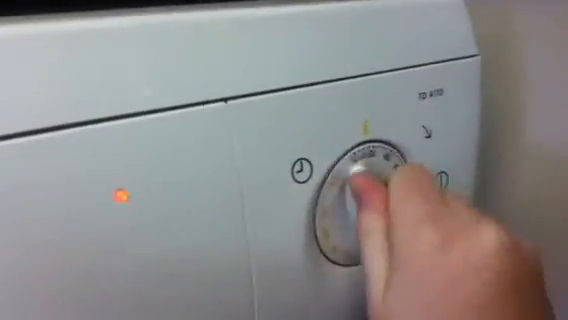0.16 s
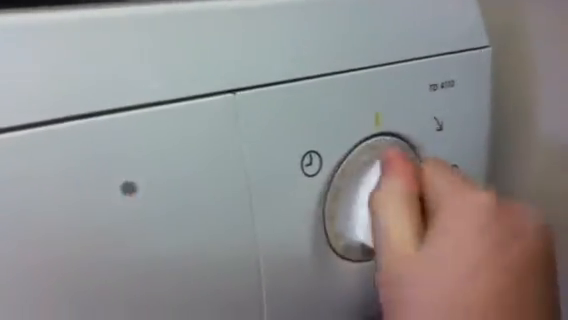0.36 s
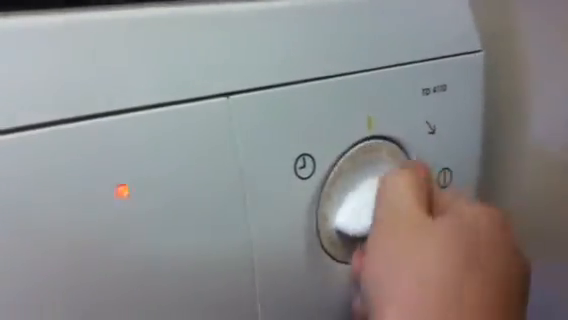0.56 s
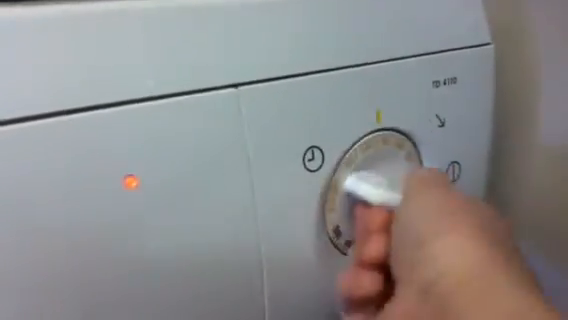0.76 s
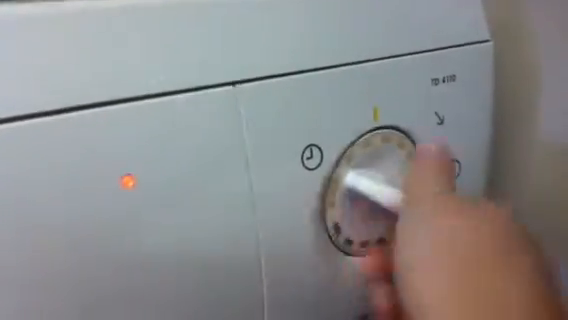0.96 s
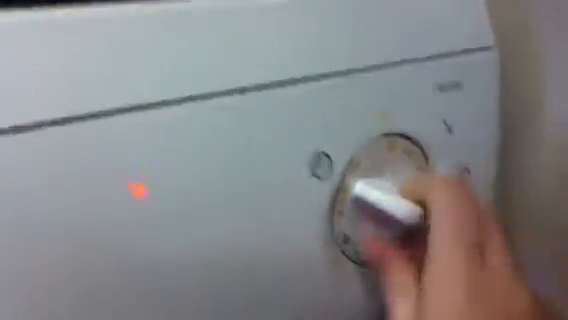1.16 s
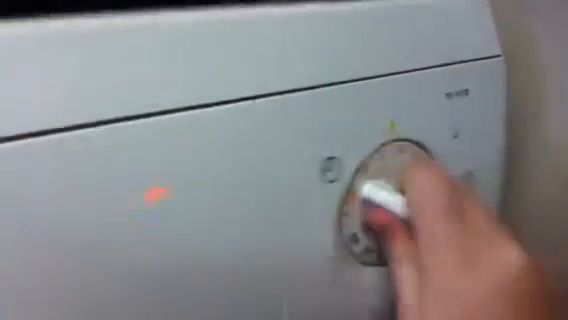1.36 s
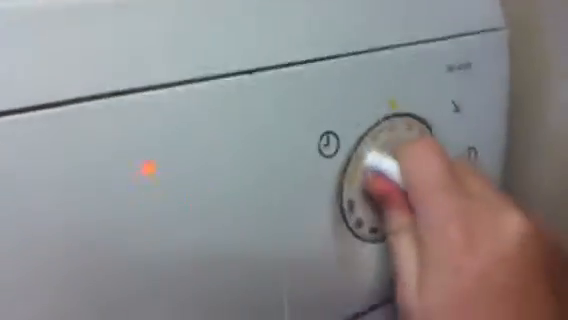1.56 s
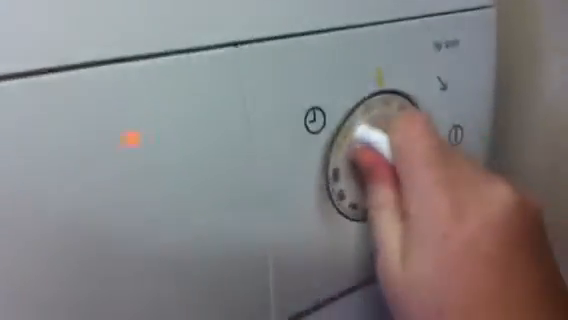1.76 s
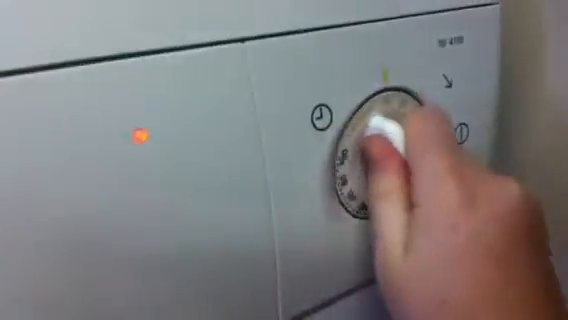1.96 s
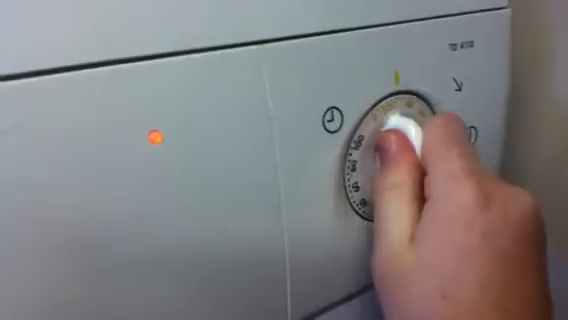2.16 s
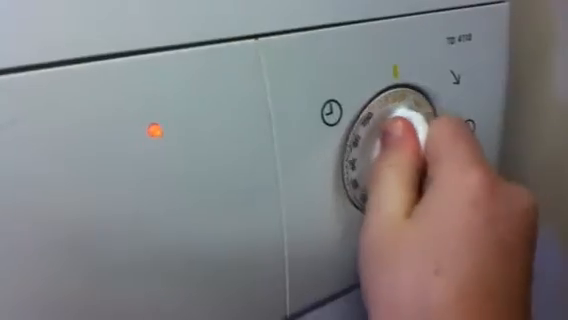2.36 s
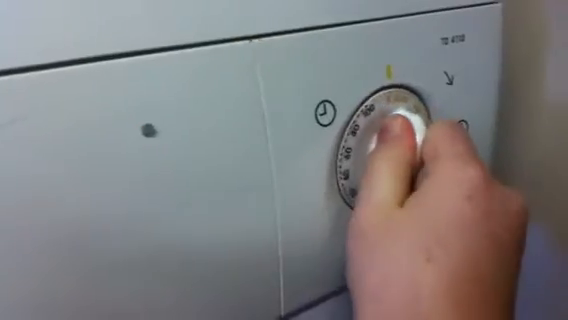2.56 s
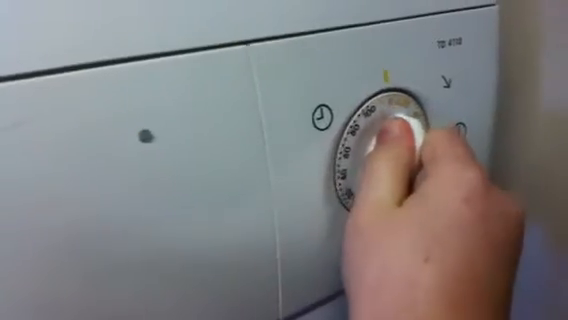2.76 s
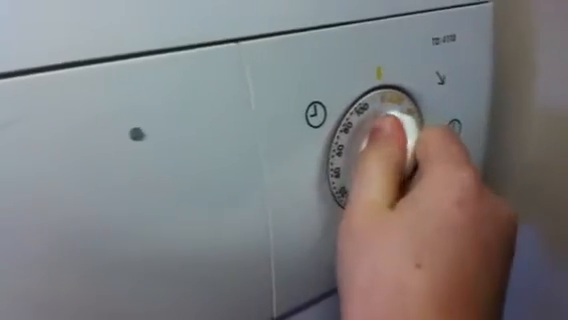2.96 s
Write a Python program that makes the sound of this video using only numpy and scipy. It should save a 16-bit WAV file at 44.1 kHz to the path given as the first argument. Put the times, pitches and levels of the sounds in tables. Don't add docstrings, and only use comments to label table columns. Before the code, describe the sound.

Appliance timer knob turned by hand: fast ratchet clicking, soft finger taps, then crisp single clicks

```python
import sys
import numpy as np
from scipy import signal
from scipy.fft import rfft, irfft, next_fast_len
from scipy.io import wavfile
from scipy.ndimage import uniform_filter1d, map_coordinates

SR = 44100
rng = np.random.default_rng(int(sys.argv[2]) if len(sys.argv) > 2 else 0)


def generate_wav(sig):
    pcm = np.round(np.clip(np.atleast_2d(sig).T, -1, 1) * 32767).astype(np.int16)
    wavfile.write(sys.argv[1], SR, pcm)


def nominal_scale(level):
    x = np.asarray(level, float) / 20
    return 10 ** x


N = 134505
LENGTH = 16384
BIN_HZ = np.fft.rfftfreq(LENGTH, 1 / SR)
MODE_DETUNE, PANEL_DETUNE = .012, .005

# f/Hz, width/Hz, level/dB
PANEL = [(178.7, 13.8, 4), (222.3, 20.4, 1), (292.7, 26, -0.5), (330.3, 33, -1), (375.3, 33, -3),
         (481, 28, -5), (590, 31, -8), (632, 27, -1.5), (680, 55, -8.5), (796, 18, -10)]


def ratchet():
    # t/s, snap level/dB, pawl f/Hz, dial level/dB, panel level/dB
    loose_run = [(.1465, -8, 4800, -11, -22.5), (.1535, -9, 4500, -20.5, -31),
                 (.1605, -18, 4800, -19.5, -34), (.1885, -17.5, 4800, -18.5, -23),
                 (.1975, -4, 4250, -12, -27.5), (.2045, -15, 4500, -38, -29.5),
                 (.2243, -9.5, 5000, -18, -27), (.2455, -7, 4630, -10.5, -34),
                 (.2655, -7.5, 4270, -16, -23), (.2735, -23.5, 4500, -10.5, -37.5),
                 (.2868, -7, 4430, -22.5, -28), (.2945, -24, 4370, -12, -24),
                 (.3105, -7.5, 4660, -18, -19.5)]
    steady_run = [(0.3451, -4.5, 4650, -15.5, -25), (0.3617, -7, 4620, -16, -26.5),
                  (0.389, -6.5, 4760, -15.5, -21.5), (0.4127, -6, 4660, -17, -25.5),
                  (0.4468, -8, 4760, -15.5, -21.5), (0.4706, -6, 4520, -16.5, -24),
                  (0.5097, -8.5, 4540, -17, -23), (0.5513, -9.5, 4990, -15.5, -24.5),
                  (0.5586, -6, 4640, -21.5, -32.5), (0.597, -9.5, 4670, -18.5, -23.5),
                  (0.633, -11.5, 4320, -19.5, -23.5), (0.6526, -11, 4620, -14.5, -35),
                  (0.6702, -6, 4840, -17.5, -21), (0.6882, -8, 4780, -14, -32.5),
                  (0.7088, -8, 4840, -13, -32), (0.7331, -8, 4710, -15.5, -28),
                  (0.7558, -9.5, 4700, -17.5, -27.5), (0.7771, -10, 4240, -20.5, -21),
                  (0.813, -7, 5060, -15.5, -34), (0.835, -8.5, 5000, -19, -28),
                  (0.8575, -8.5, 4220, -16.5, -26), (0.8775, -6.5, 4420, -17.5, -25),
                  (0.9084, -8.5, 4540, -15.5, -29), (0.9472, -9.5, 4500, -17, -27)]
    # t/s, snap level/dB, pawl f/Hz, dial f/Hz, wheel f/Hz
    teeth = [(1.6291, -3.5, 4350, 1860, 8210), (1.7047, -2.5, 4700, 1590, 7250),
             (1.8598, -4.5, 4720, 1670, 6390), (1.942, -3, 4600, 1590, 7140),
             (2.0311, -5, 4780, 1910, 7330), (2.0833, -4.5, 4790, 2050, 7200),
             (2.1463, -8, 4700, 1840, 6640), (2.2024, -6.5, 4700, 1590, 7140),
             (2.2629, -8.5, 4320, 1650, 6840), (2.3577, -9.5, 4500, 2260, 6000),
             (2.4015, -6.5, 4420, 1795, 6800), (2.4734, -5.5, 4430, 1770, 6400),
             (2.5148, -6.5, 4300, 1590, 6360), (2.588, -4, 5030, 1590, 7340), (2.771, -3, 4550, 1950, 6390)]
    # dial level/dB, panel level/dB, pawl level/dB, wheel level/dB
    tooth_mix = [(-14.5, -22.5, 29, 24), (-8.5, -23.5, 8, -4.5), (-12.5, -25.5, 3, -4.5), (-14, -24, 9, 1),
                 (-17, -25, 9, -4.5), (-17.5, -29.5, 12, -16.5), (-16.5, -29, 5.5, -7), (-18, -27, -2, -2),
                 (-17.5, -29.5, -1, 1), (-23, -25.5, 20.5, 11), (-17.5, -31.5, 18, 5),
                 (-21.5, -26.5, 19.5, 3.5), (-16.5, -25, 11, 3.5), (-15, -27, 9.5, 2.5),
                 (-14, -26.5, -2.5, -3.5)]
    # f/Hz, width/Hz, level/dB
    dial_modes = [(1235, 237, -9.5), (1590, 55, 5.5), (1798, 32, -4), (1882, 73, 6.5), (2220, 890, 2.5)]
    snap_trim_db, chatter_s = -12, .019

    out = np.zeros(N)
    for rows, run_chatter_s, pawl_db, tilt_db in ((loose_run, .035, 3, -2.5),
                                                  (steady_run, chatter_s, 14, -1.1)):
        s, snap_db, pawl_hz, dial_db, panel_db = np.transpose(rows)
        out += blows(s, snap_db + snap_trim_db, pawl_hz, dial_db, panel_db, dial_modes, run_chatter_s,
                     pawl_db, wheel_db=1.7, case_db=0.53, tilt_db=tilt_db)

    s, snap_db, pawl_hz, dial_hz, wheel_hz = np.transpose(teeth)
    dial_db, panel_db, pawl_db, wheel_db = np.transpose(tooth_mix)
    return out + blows(s, snap_db + snap_trim_db - 1.5, pawl_hz, dial_db, panel_db, dial_modes, chatter_s,
                       pawl_db[:, None] + 2.5, wheel_db[:, None], case_db=-2.0, tilt_db=1.7,
                       favoured_hz=(dial_hz[:, None], wheel_hz[:, None]))


def fingers():
    # t/s, tick level/dB, dial level/dB, panel level/dB
    taps = [(0.0856, -26.5, -48, -42), (0.096, -29.5, -29, -38.5), (1.0539, -25, -33.5, -37),
            (1.0687, -22.5, -26, -36), (1.0838, -22.5, -36, -46), (1.096, -34, -21.5, -33.5),
            (1.1096, -30, -60, -59), (1.1394, -23, -34.5, -42), (1.2378, -22.5, -24.5, -33.5),
            (1.2495, -11.5, -14.5, -27), (1.2626, -40, -20.5, -26.5), (1.278, -14, -25, -30),
            (1.4748, -17.5, -22.5, -33.5), (1.535, -17, -19, -31.5)]
    # f/Hz, width/Hz, level/dB
    knob_modes = [(307, 37, 3), (865, 1100, 1), (1360, 1260, 1.5), (2200, 140, 0)]
    s, tick_db, dial_db, panel_db = np.transpose(taps)
    pawl_hz = np.full(len(s), 4500)
    return blows(s, tick_db - 21.5, pawl_hz, dial_db + .1, panel_db + 0.11, knob_modes, chatter_s=0.0059,
                 pawl_db=-35.0, wheel_db=-6.5, case_db=2.2, front_db=-12)


def blows(s, snap_db, pawl_hz, dial_db, panel_db, dial_modes, chatter_s, pawl_db, wheel_db, case_db,
          tilt_db=0, favoured_hz=None, front_db=0):
    # f/Hz, width/Hz, level/dB
    wheel_modes = [(3076, 81, 7.5), (3395, 360, -7), (5260, 410, -1), (6300, 100, 8.5), (7050, 2000, -7.5),
                   (9020, 2520, -5), (11570, 1900, -16)]
    # f/Hz, width/Hz, level/dB
    front_modes = [(1364, 24, -2), (1613, 35, 7), (1770, 30, 1), (1890, 35, 3), (2310, 28, -9.5),
                   (2550, 16, -10), (3070, 13, -2.5), (3460, 17, 2.5), (4230, 33, 0), (4640, 30, -4),
                   (4800, 53, -2), (5760, 42, 7.5)]
    # f/Hz, level/dB
    crack = [(1470, -47.5), (2500, -12), (4730, -4), (5920, -8.5), (8200, -8), (12900, -36.5), (16000, -45)]
    count, f = len(s), BIN_HZ
    burst = contacts(count, chatter_s)

    def part(response, db):
        return nominal_scale(db)[:, None] * unit(irfft(burst * response, LENGTH))

    pawl = peak(f, np.clip(pawl_hz, 4350, 4950)[:, None], 190)
    metal = nominal_scale(wheel_db) * body(wheel_modes, count) + nominal_scale(pawl_db) * pawl
    plastic = body(dial_modes, count)
    if favoured_hz:
        plastic = plastic + nominal_scale(12.4) * peak(f, favoured_hz[0], 107)
        metal = metal + nominal_scale(6.7) * peak(f, favoured_hz[1], 142)
    metal = metal + nominal_scale(-4.5 + along(crack, f))
    metal = metal * nominal_scale(tilt_db * np.log2(f / 4500 + .1)) / (1 + 1j * f / 11000) ** 2
    plastic = plastic / (1 + 1j * f / 3030) ** 2

    full = part(metal, snap_db)
    full += part(plastic, dial_db - 8)
    full += part(body(front_modes, count, PANEL_DETUNE), dial_db - 18 + front_db)
    full += part(body(PANEL, count, PANEL_DETUNE), panel_db - 4)
    full += part(peak(f, 46, 46) ** 2, snap_db - 39.5)
    full += surroundings(snap_db, dial_db, panel_db, case_db)

    lead = 128
    out = np.zeros(N + LENGTH)
    for start, row in zip(np.round(s * SR).astype(int), np.roll(full, lead, axis=1)):
        out[start - lead:][:LENGTH] += row
    return out[:N]


def contacts(count, chatter_s):
    t = np.arange(2048) / SR
    rise_s, spiky_db = .0009, 4
    spikes = nominal_scale(spiky_db * rng.standard_normal((count, 2048))) * rng.standard_normal((count, 2048))
    envelope = nominal_scale(-60 * t / chatter_s) * (1 - np.exp(-t / rise_s))
    burst = evened(rfft(spikes * envelope, LENGTH))

    luck = rng.random((count, 2))
    bounce_db = -13.5 + 6 * luck[:, :1]
    bounce_s = .006 + .012 * luck[:, 1:]
    dull = 1 / (1 + 1j * BIN_HZ / 4950) ** 2
    return burst * (1 + nominal_scale(bounce_db) * dull * np.exp(-2j * np.pi * BIN_HZ * bounce_s))


def evened(burst):
    evenness = 0.66
    cepstrum = irfft(np.log(np.abs(burst) + 1e-3), LENGTH)
    fold = np.where(np.arange(LENGTH) < LENGTH // 2, 2., 0.)
    fold[0] = 1
    return burst * np.exp(-evenness * rfft(cepstrum * fold))


def surroundings(snap_db, dial_db, panel_db, case_db):
    # f/Hz, t60/s
    case_t60 = [(150, 0.61), (400, 0.29), (1000, 0.16), (2800, 0.094), (7300, 0.051), (15000, 0.016)]
    # f/Hz, t60/s
    room_t60 = [(150, 0.35), (1000, 0.34), (4000, .22), (8000, 0.17), (13000, 0.15), (15500, 0.069)]
    # f/Hz, level/dB
    case_colour = [(60, -14.5), (140, -7.5), (400, -5), (1000, 0), (2500, 0.5), (4700, 3.5), (8000, -2),
                   (16000, -0.5)]
    # f/Hz, level/dB
    room_colour = [(3000, 0.8), (8000, -2.5), (14000, -13)]
    count, f = len(snap_db), BIN_HZ
    drive_db = np.array([along([(600, low), (1500, mid), (3500, high)], f)
                         for low, mid, high in zip(panel_db, dial_db, snap_db)])
    colour = nominal_scale(drive_db + case_db + along(case_colour, f))
    colour = colour * (1 + nominal_scale(9) * np.abs(body(PANEL, count, PANEL_DETUNE)))
    case = nominal_scale(1) * tail(case_t60, count)
    room = nominal_scale(-7.5 + along(room_colour, f)) * tail(room_t60, count)
    return irfft(colour * (case + room), LENGTH)


def tail(t60s, count):
    rise_s, rattle_db = .0024, 4.5
    hz, t, z = signal.stft(rng.standard_normal((count, LENGTH - 2048)), SR, nperseg=128)
    rattle = uniform_filter1d(np.angle(z[:, ::-1, ::-1]), size=7, axis=1)
    decay_db = -60 * t / along(t60s, hz)[:, None]
    x = signal.istft(z * nominal_scale(rattle_db * rattle + decay_db), SR, nperseg=128)[1]
    swell = 1 - np.exp(-np.arange(x.shape[1]) / SR / rise_s)
    return rfft(unit(x * swell), LENGTH)


def body(modes, count, detune=MODE_DETUNE):
    scatter_db = 2
    luck = rng.standard_normal((count, len(modes), 2))
    response = 0
    for k, (hz, width_hz, db) in enumerate(modes):
        gain = (-1) ** k * nominal_scale(db + scatter_db * luck[:, k, :1])
        response = response + gain * peak(BIN_HZ, hz * (1 + detune * luck[:, k, 1:]), width_hz)
    return response


def peak(f, hz, width_hz):
    return 1j * f * width_hz / (hz * hz - f * f + 1j * f * width_hz)


def unit(x):
    return x / np.sqrt(np.sum(x ** 2, axis=-1, keepdims=True) / (0.0088 * SR) + 1e-20)


def along(points, hz):
    f, v = np.transpose(points)
    return np.interp(np.log(hz + 1), np.log(f + 1), v)


def spring():
    release_s, ring_hz, ring_db, t60_s = 2.59, 5900, -50, 0.58
    t = np.maximum(np.arange(N) / SR - release_s, 0)
    return nominal_scale(ring_db - 60 * t / t60_s) * np.sin(2 * np.pi * ring_hz * t)


def mains():
    buzz_hz, buzz_db, off_s = 96.2, -60.5, 2.3
    t = np.arange(N) / SR
    wobble = map_coordinates(rng.standard_normal((2, 60)), [[[0] * N, [1] * N], [t * 15, t * 15]])
    buzz = np.sin(2 * np.pi * buzz_hz * t + 0.43 * wobble[1])
    return nominal_scale(buzz_db + 4.7 * wobble[0]) * buzz * np.clip((off_s - t) / .05, 0, 1)


def machine_hum():
    # f/Hz, density/dB
    spectrum = [(18, -57), (30, -29.5), (197, -7), (349, -5), (535, -20), (610, -15.5), (1500, -36.5),
                (1950, -65.5), (3300, -120)]
    # t/s, level/dB
    level = [
        (0, -31.5),
        (.15, -43),
        (.9, -23),
        (1.401, -44),
        (2.5, -31.5),
        (2.898, -37.5),
        (3.05, -44),
    ]
    return steady(spectrum, level, trim_db=-12.0, wobble_db=0.5)


def hiss():
    # f/Hz, density/dB
    spectrum = [(600, -19.5), (1000, 1), (2000, 0), (4000, -11.5), (8000, -11), (15500, -21.5)]
    # t/s, level/dB
    level = [
        (0, -55.5),
        (1.4, -58),
        (3.05, -64.5),
    ]
    return steady(spectrum, level, trim_db=.1, wobble_db=.7)


def steady(spectrum, level, trim_db, wobble_db):
    m = next_fast_len(N)
    gain = nominal_scale(along(spectrum, np.fft.rfftfreq(m, 1 / SR)))
    x = irfft(rfft(rng.standard_normal(m)) * gain, m)[:N]
    wobble = map_coordinates(rng.standard_normal(40), [np.arange(N) * 10 / SR])
    level_db = np.interp(np.arange(N) / SR, *np.transpose(level))
    return nominal_scale(level_db + trim_db + wobble_db * wobble) * x / x.std()


def scene():
    return (ratchet() + fingers() + spring() + mains() + machine_hum() + hiss())[None]


def starve(x):
    # f/Hz, depth/dB
    depth = [(1500, 55.5), (2500, 52.5), (6000, 40), (10000, 36), (16000, 41.5)]
    frame, lead = 8, 4
    attack_db, next_frame_db, ragged_db = 8, -46, 4
    hz, t, z = signal.stft(x, SR, nperseg=256)
    power = uniform_filter1d(uniform_filter1d(np.abs(z) ** 2, size=8, axis=0), size=2, axis=1)
    treble = power[hz > 1000].sum(0)
    attacks = treble * (treble > nominal_scale(2 * attack_db) * np.roll(treble, 3))

    padded = np.pad(attacks, (lead, -(len(t) + lead) % frame))
    near = np.repeat(padded.reshape(-1, frame).max(1), frame)[lead:][:len(t)]
    near = np.maximum(near, nominal_scale(next_frame_db) * np.roll(near, frame))

    ragged = np.kron(rng.standard_normal((17, len(t) // 2 + 1)), np.ones((8, 2)))[:len(hz), :len(t)]
    threshold = near * nominal_scale(2 * ragged_db * ragged - 2 * along(depth, hz)[:, None])
    return signal.istft(z * (power > threshold), SR, nperseg=256)[1][:N]


def roll_off(x):
    return signal.sosfilt(signal.butter(12, 16800, fs=SR, output="sos"), x)


def record(dry):
    ceiling, top_hz, edge_hz = .8, 15750, 150
    x = dry[0] / (1 + np.abs(dry[0] / ceiling) ** 4) ** .25
    low_pass = (1 - np.tanh((np.fft.rfftfreq(N, 1 / SR) - top_hz) / edge_hz)) / 2
    x = irfft(rfft(x) * low_pass, N)
    return roll_off(starve(x)[None])


dry = scene()
out = record(dry)
generate_wav(out)
```